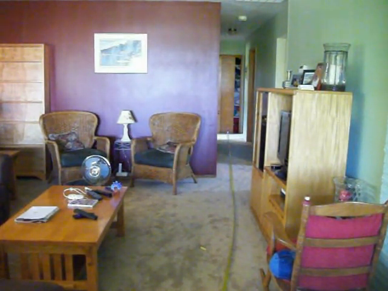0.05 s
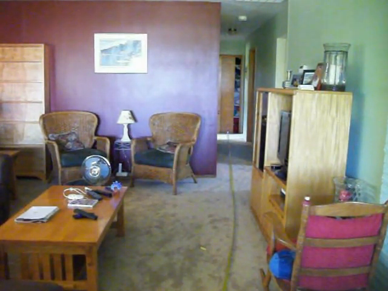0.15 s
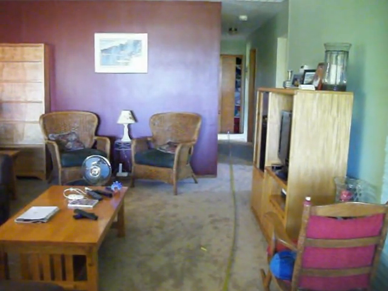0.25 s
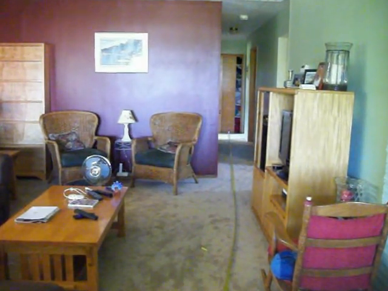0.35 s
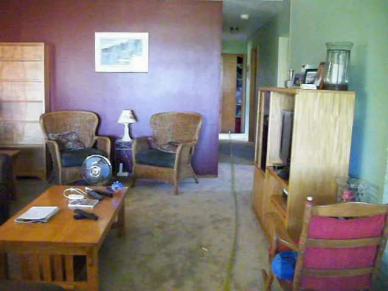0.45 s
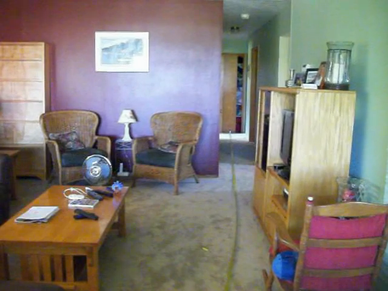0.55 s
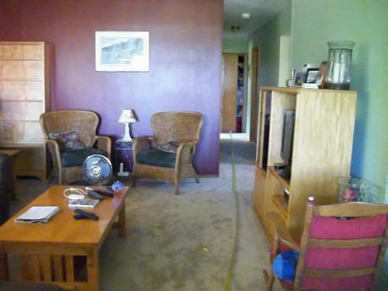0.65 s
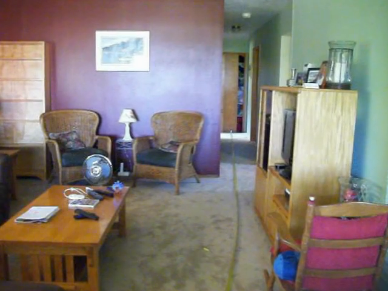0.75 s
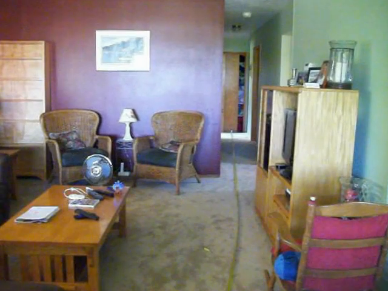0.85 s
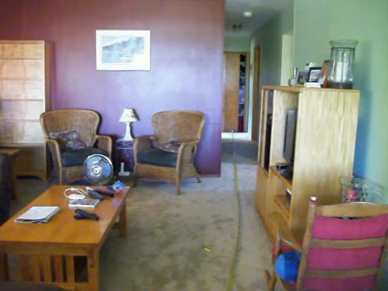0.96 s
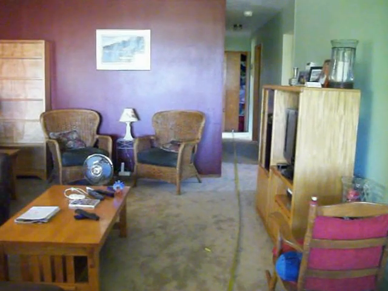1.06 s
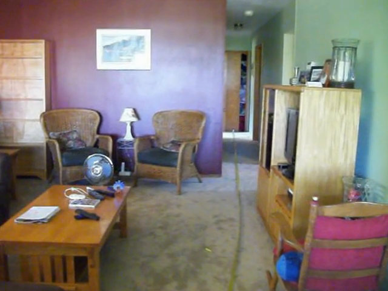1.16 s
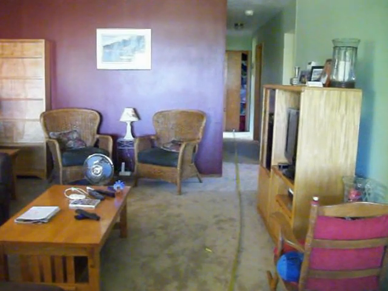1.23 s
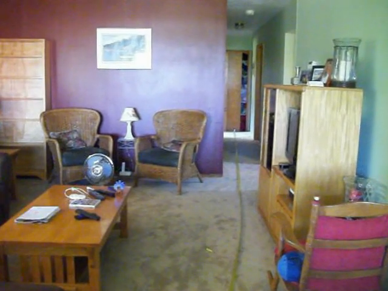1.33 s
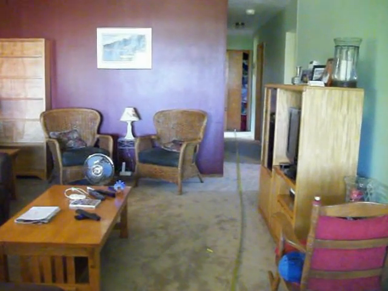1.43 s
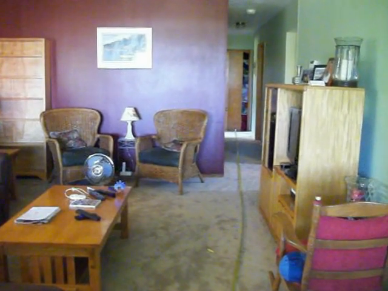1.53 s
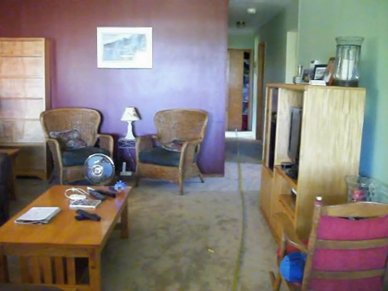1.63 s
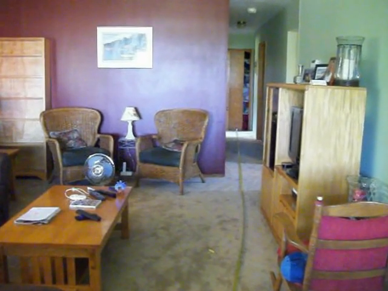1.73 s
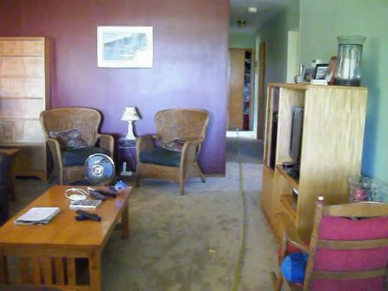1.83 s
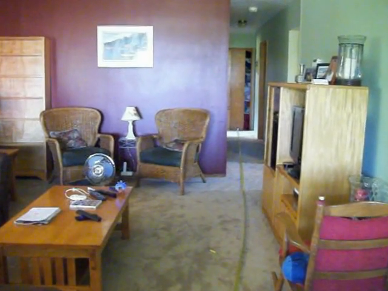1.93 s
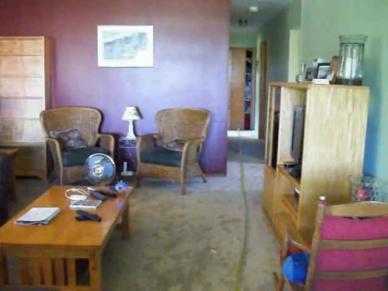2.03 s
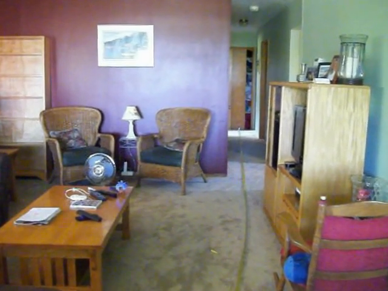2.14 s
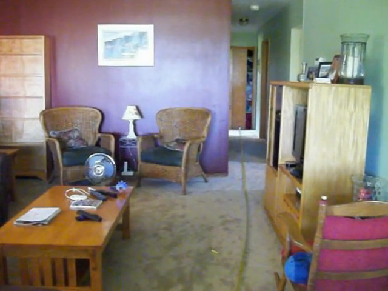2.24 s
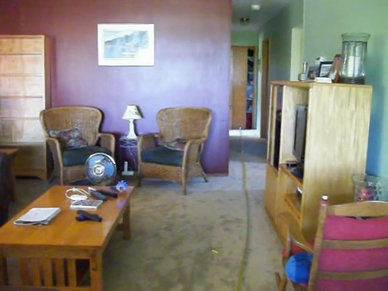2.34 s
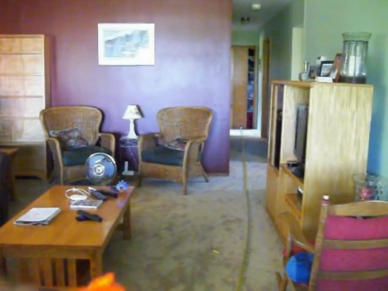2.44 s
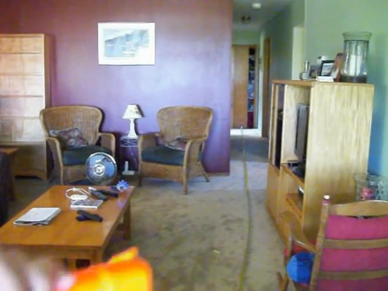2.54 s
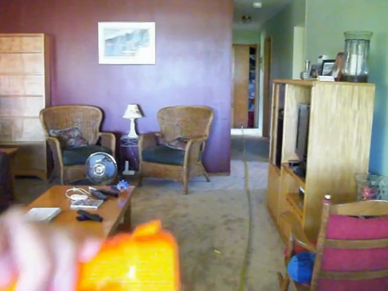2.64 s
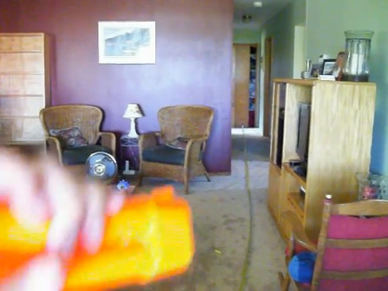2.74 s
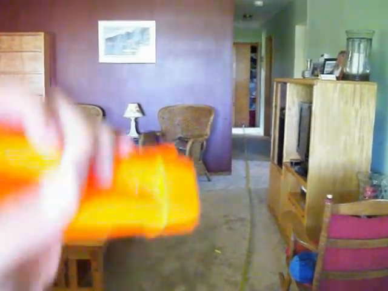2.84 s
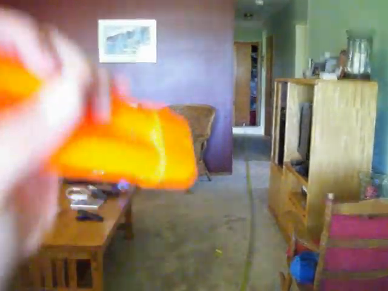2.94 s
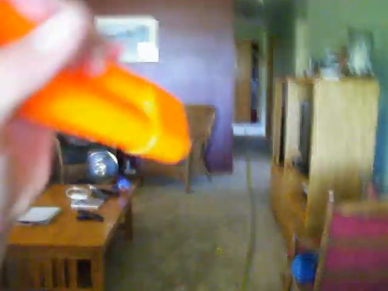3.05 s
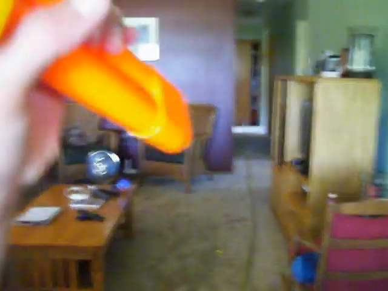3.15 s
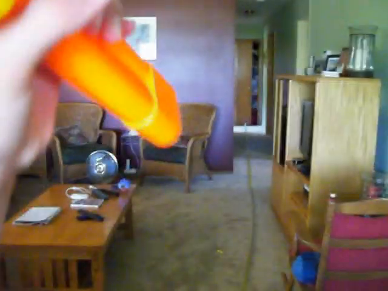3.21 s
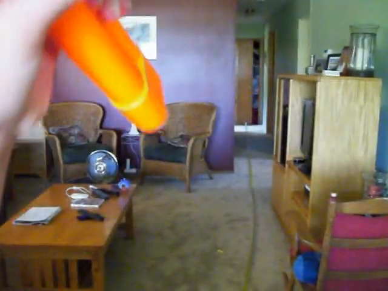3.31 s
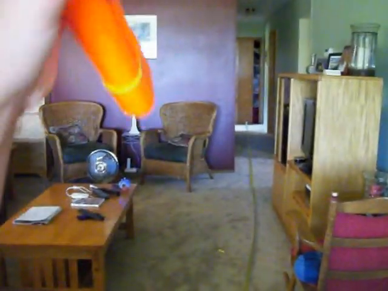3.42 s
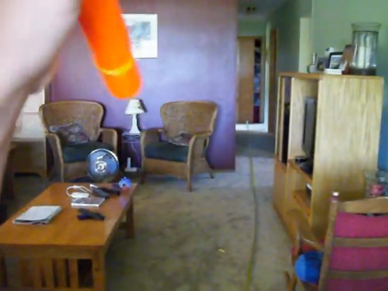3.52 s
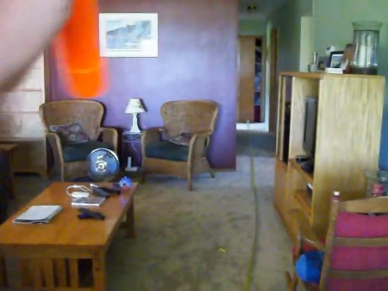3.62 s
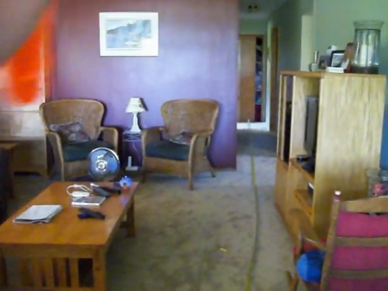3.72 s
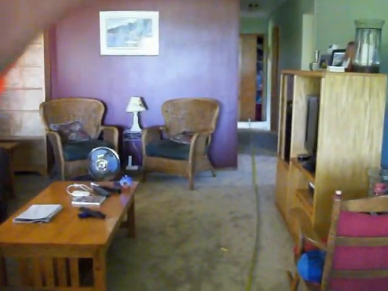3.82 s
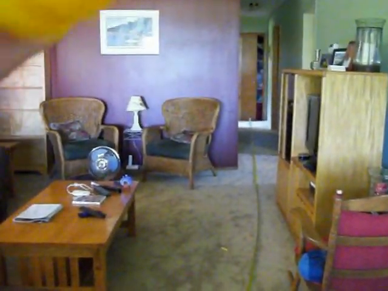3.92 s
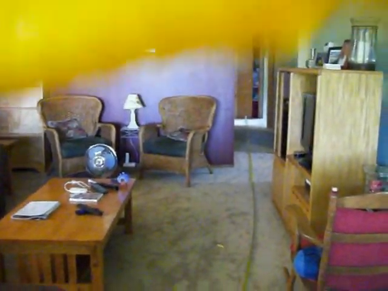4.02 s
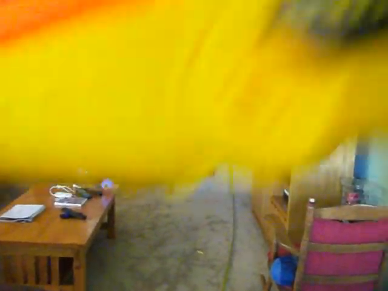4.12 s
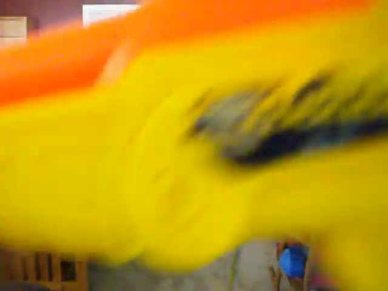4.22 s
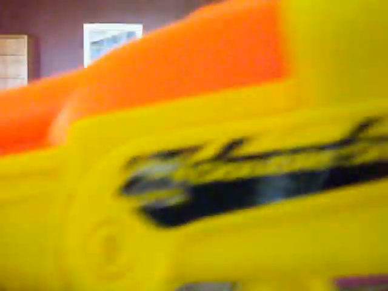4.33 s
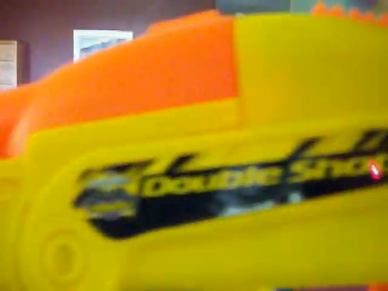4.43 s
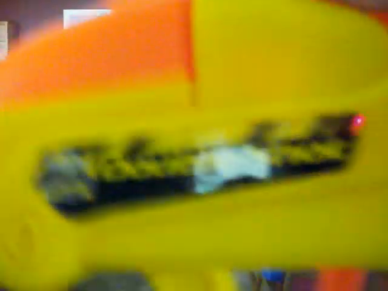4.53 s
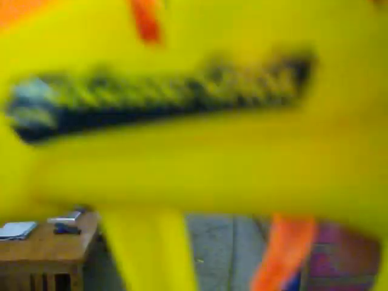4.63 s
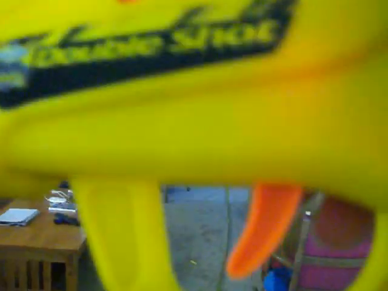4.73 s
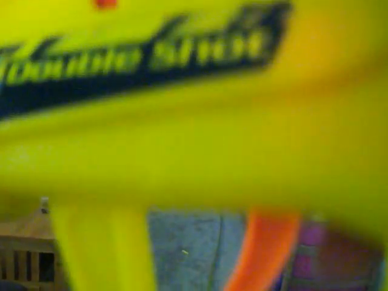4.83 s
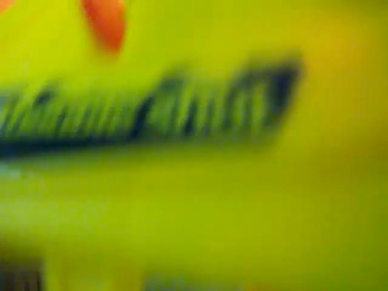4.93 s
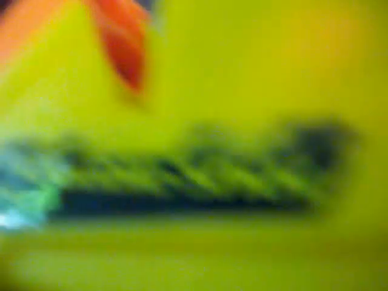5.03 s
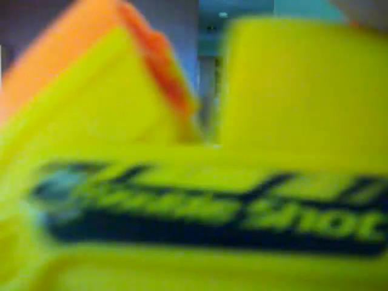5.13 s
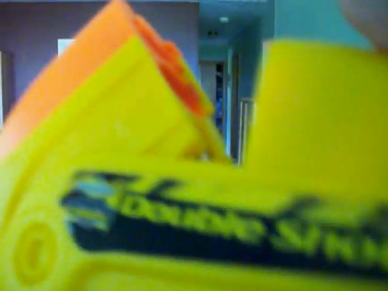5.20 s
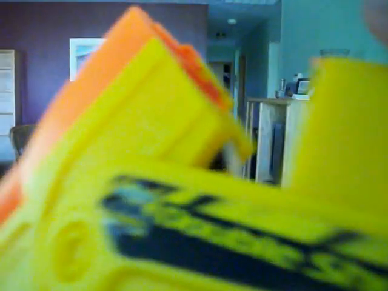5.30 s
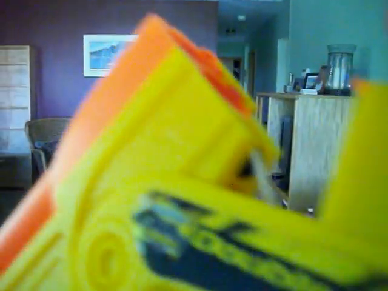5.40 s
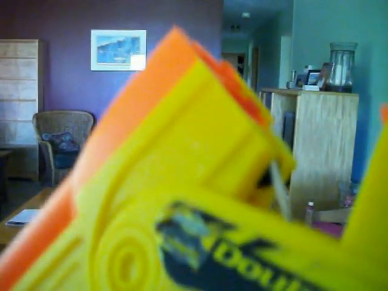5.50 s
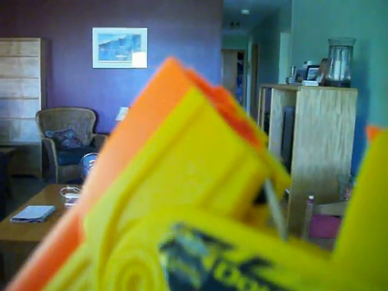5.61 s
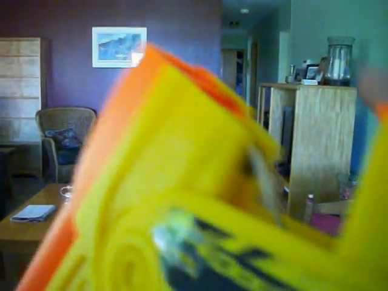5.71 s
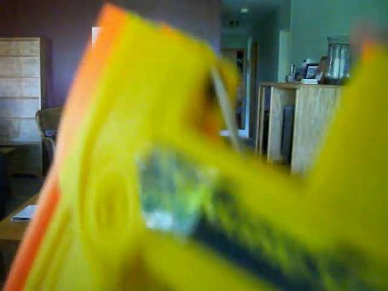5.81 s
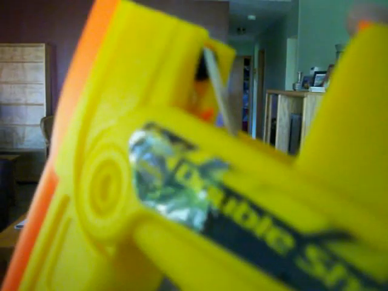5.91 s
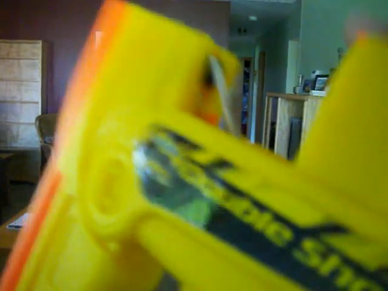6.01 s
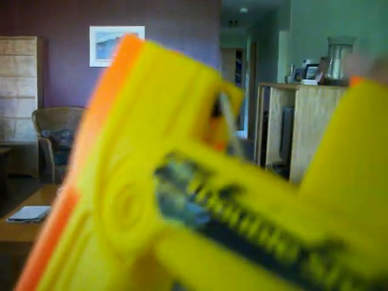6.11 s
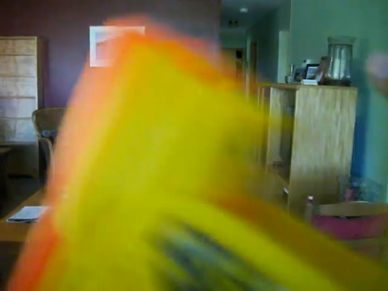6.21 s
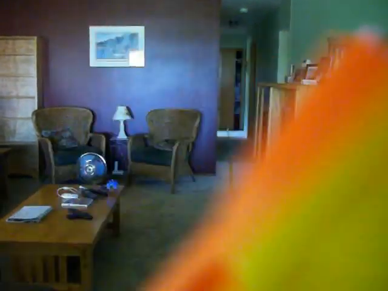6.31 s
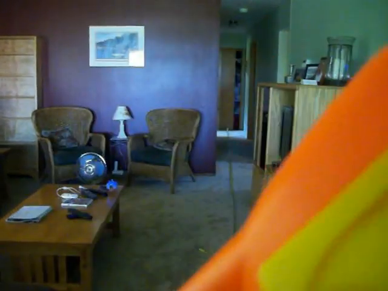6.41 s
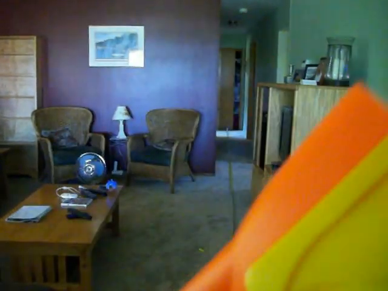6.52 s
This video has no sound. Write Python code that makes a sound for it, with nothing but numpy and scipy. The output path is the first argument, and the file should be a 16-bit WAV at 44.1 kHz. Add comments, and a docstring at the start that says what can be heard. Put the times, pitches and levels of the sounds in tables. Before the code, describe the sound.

In a quiet, softly humming living room, small plastic ticks and a faint hand brush lead to a brief toothed rasp. Around three seconds, a barrel bumps the microphone with dry knocks and low booms. After a pause, a hollow toy blaster is worked very close: sharp latch snaps, scraping slides and short hinge squeaks crowd together, growing louder and overloading a narrow, dull microphone, until the end.

```python
"""A plastic spring blaster is handled in a quiet living room: a few ticks, a hand's brush, a short rasp of a catch.
About 3 s in, its barrel bumps the microphone, which booms and knocks.
Then it is broken open close by: latches snap, and the barrel grinds and squeaks round its hinge.
Snaps, rasp and slides are pushes into one hollow shell's resonances; squeaks are harmonics, bands of hiss are noise.
A narrow-band recorder overloads on the hardest blows, over soft room noise, hum and whines."""
import sys
import numpy as np
from scipy import signal
from scipy.fft import rfft, irfft
from scipy.io import wavfile
from scipy.ndimage import uniform_filter1d

SR = 44100
rng = np.random.default_rng(int(sys.argv[2]) if len(sys.argv) > 2 else 0)


def materialize(psi):
    """Save the field psi as 16-bit PCM at rate SR to the path in sys.argv[1].

    A 1-D psi becomes a single channel; in a 2-D psi each row is a channel.
    """
    bounded = np.clip(np.atleast_2d(psi).T, -1, 1)
    quanta = np.round(bounded * 32767).astype(np.int16)
    wavfile.write(sys.argv[1], SR, quanta)


N = 289296


def from_db(db):
    """Amplitude ratio of a level in dB."""
    return 10 ** (np.asarray(db) / 20)


def rms_one(x):
    """Scale to rms 1."""
    return x / np.sqrt(np.mean(x ** 2) + 1e-20)


def at_hz(points, hz, axis=1):
    """Read a column of a table on a log-frequency axis."""
    points = np.array(points)
    return np.interp(np.log(np.maximum(hz, 1)), np.log(points[:, 0]), points[:, axis])


def add(out, start_s, sound):
    """Mix a sound in at a time."""
    i = max(int(start_s * SR), 0)
    out[i:i + len(sound)] += sound[:max(N - i, 0)]


def gate(t, length_s, edge_s):
    """A window with short linear ramps."""
    return np.clip(t / edge_s, 0, 1) * np.clip((length_s - t) / edge_s + .5, 0, 1)


def resonate(x, hz, width_hz):
    """One two-pole resonance."""
    r = np.exp(-np.pi * width_hz / SR)
    return signal.lfilter([1, 0, -1], [1, -2 * r * np.cos(2 * np.pi * hz / SR), r * r], x + 1e-18)


def favour(modes, centres_hz, lift_db, spread_oct):
    """The part that is struck brings out the resonances near its own pitches."""
    favoured = []
    for hz, width_hz, db in modes:
        lift = sum(lift_db * np.exp(-(np.log2(hz / centre) / spread_oct) ** 2) for centre in centres_hz)
        favoured.append((hz, width_hz, db + lift))
    return favoured


BASS_EDGE_HZ, TREBLE_EDGE_HZ = 600, 1800


def ranges(force, modes, vary_db, detune, shift_db=0):
    """Bass, middle, treble of a body's answer, rms 1 each; contacts favour other modes, sliding ones keep shifting."""
    out = np.zeros((3, len(force)))
    at = np.arange(len(force)) / 200  # a new random shift every 200 samples
    for k, (hz, width_hz, db) in enumerate(modes):
        knots = int(at[-1]) + 2
        shift = np.interp(at, np.arange(knots), rng.standard_normal(knots))
        mode_hz = hz * np.exp(detune * rng.normal())
        mode = rms_one(resonate(force * from_db(shift_db * shift), mode_hz, width_hz))
        part = int(hz > BASS_EDGE_HZ) + int(hz > TREBLE_EDGE_HZ)
        out[part] += (-1) ** k * from_db(db + vary_db * rng.normal()) * mode
    return [rms_one(part) for part in out]


def blows(rows, modes, chatter, bass_db, middle_db, treble_db, size=6000):
    """Each blow is a sharp push and a dying chatter of the loose parts, ringing the body."""
    out, t = np.zeros(N), np.arange(size) / SR
    for start_s, db, bass, treble, t60_s, *centres_hz in rows:
        force = chatter * rng.standard_normal(size) * from_db(-60 * t / max(t60_s, .003))
        force[0] += 1
        struck = favour(modes, centres_hz, lift_db=5, spread_oct=0.25)
        parts = ranges(force, struck, vary_db=2.0, detune=0.035)
        levels = from_db(db + np.array([bass + bass_db, middle_db, treble + treble_db]))
        add(out, start_s, sum(level * part / np.abs(part).max() for level, part in zip(levels, parts)))
    return out


# Resonances of the hollow shell. Each row: centre in Hz, width in Hz, level in dB within its range.
SHELL = [(221, 250, -2.5), (410, 102, 0.5), (679, 68, -7.5), (810, 104, -2.5), (941, 158, 1),
         (1179, 194, 0.5), (1478, 210, -2), (1748, 255, -2), (2072, 520, -0.5), (2600, 407, 1.5),
         (2853, 626, 1.5), (3836, 563, -0.5), (4460, 470, -1), (5240, 1130, -4.5)]
# Snaps of latches and ribs, levels before trims. Each row: start in seconds, peak of the middle range in dB,
# bass re middle in dB, treble re middle in dB, favoured middle pitch in Hz, favoured treble pitch in Hz.
SNAPS = [(0.159, -42.5, -8.5, -6, 953, 2570), (0.455, -34.5, -12, -10, 1046, 2240),
         (0.484, -34.5, -6, -9, 1000, 4280), (0.783, -42.5, -14, 1.5, 727, 4630),
         (1.214, -39, -12, -6.5, 1400, 2160), (1.387, -23.5, -19, -4.5, 939, 2920),
         (1.394, -22, -21, -0.5, 982, 2580), (1.932, -26, -15, -16, 680, 2400),
         (2.217, -23, -29, -2, 1600, 2150), (2.335, -27.5, -23, -2, 1330, 2920),
         (2.439, -27, -27, -9.5, 921, 1850), (2.664, -31.5, -12, 0.5, 990, 2953),
         (2.697, -36.5, -16, -2.5, 950, 4640), (2.86, -38, -14, 4, 1720, 2410),
         (3.773, -26, -18, -9, 1210, 3110), (4.01, -14.5, -25.5, 0, 1690, 1980),
         (4.02, -26, -32, -5.5, 1710, 2050), (4.292, -32, -9, -4, 945, 2050),
         (4.336, -23.5, -18, -2.5, 948, 2860), (4.513, -23.5, -17.5, -19.5, 730, 1900),
         (4.538, -26.5, -3, -9.5, 1480, 1890), (4.591, -7, -18, -2, 1644, 2230),
         (4.602, -13.5, -21, -8.5, 1010, 3570), (4.633, -20, -24.5, 6, 884, 2680),
         (4.653, -8.5, -16, -8, 876, 2990), (4.664, -21, -14, -3, 1030, 2820),
         (4.686, -9.5, -24.5, -13.5, 920, 2160), (4.697, -15.5, -33, -14, 985, 2000),
         (4.766, -11.5, -27, -18, 1070, 1930), (4.782, -17, -15, -0.5, 937, 4770),
         (4.8, -9, -22.5, -6.5, 1040, 2050), (4.858, -15, -20, -5.5, 1030, 2036),
         (4.884, -12, -20, -9, 880, 2000), (4.89, -10.5, -22, -6.5, 813, 2837),
         (4.946, -13, -19, 1, 1180, 4060), (4.978, -14.5, -12, -6, 1180, 2430),
         (5.019, -19.5, -23, -3.5, 1160, 2580), (5.052, -12, -15.5, -3, 848, 3050),
         (5.06, -12, -18.5, 2, 1250, 2500), (5.07, -12.5, -22.5, -10, 1250, 3520),
         (5.131, -16.5, -23.5, -3.5, 701, 3330), (5.147, -6, -20.5, -8.5, 1250, 4300),
         (5.194, -19.5, -22, -1.5, 1030, 1910), (5.228, -19.5, -28, -5.5, 1660, 1910),
         (5.249, -20.5, -18, -3, 985, 3510), (5.266, -22, -24, -7.5, 937, 4030),
         (5.281, -14, -28, -3.5, 1673, 3570), (5.31, -23, -18, 2.5, 794, 3890),
         (5.322, -11.5, -32.5, -10, 1540, 1820), (5.337, -18, -20, -0.5, 814, 3900),
         (5.377, -6.5, -25.5, -4, 950, 4760), (5.403, -9, -15, -4.5, 807, 1800),
         (5.418, -13.5, -19, -5, 972, 3790), (5.468, -4.5, -23, -5.5, 928, 1890),
         (5.493, -0.5, -22.5, -5, 908, 2215), (5.561, -8, -20.5, -6, 1140, 4160),
         (5.594, -8.5, -26, -3, 950, 1953), (5.685, -6.5, -23, -2, 943, 3786),
         (5.711, -9.5, -9.5, -15.5, 984, 2080), (5.753, -6, -18, -6, 894, 1793),
         (5.813, -17.5, -20, 3.5, 1060, 2190), (5.83, -8.5, -16, 3.5, 910, 4520),
         (5.875, -9.5, -12, -1, 945, 2910), (5.885, -6.5, -16.5, -5.5, 914, 4060),
         (5.907, -4.5, -24, -10, 950, 1860), (5.958, -6, -21.5, -7.5, 1440, 1810),
         (5.965, -7, -19.5, -8, 950, 3500), (6.027, -6, -27.5, -3, 904, 1950),
         (6.035, -6.5, -32, -10.5, 930, 1870), (6.045, -11.5, -21.5, -9.5, 870, 1850),
         (6.073, -10, -23, 1.5, 1110, 3850), (6.097, -9.5, -32, 0, 1130, 3590),
         (6.123, -5.5, -32, -7, 1040, 1920), (6.153, -16, -26, 3, 1150, 3720),
         (6.189, -6.5, -31.5, -2.5, 869, 3840), (6.26, -10.5, -23, -4, 950, 3030),
         (6.303, -6.5, -29.5, -4.5, 1030, 4610), (6.35, -6, -22.5, -4, 1260, 4760),
         (6.405, -2.5, -27.5, -7, 999, 1835), (6.489, -17, -32, 3, 1040, 3480)]
SHELL_CHATTER = .1  # rms of the chatter at its start, re the push
SNAP_T60_S, SOFT_DOUBLING_DB = 0.032, 18.5  # chatter decay; doubles per so many dB less treble


def snaps():
    """Latches and ribs strike the shell; the chatter of soft, dull contacts lasts longer."""
    rows = []
    for start_s, db, bass, treble, *pitches_hz in SNAPS:
        t60_s = SNAP_T60_S * 2 ** (-treble / SOFT_DOUBLING_DB)
        rows.append((start_s, db, bass, treble, t60_s, *pitches_hz))
    return blows(rows, SHELL, chatter=SHELL_CHATTER, bass_db=2.0, middle_db=-0.74, treble_db=7.5)


# Strokes of plastic on plastic. Each row: start in seconds, end in seconds, level in dB before trim,
# treble re middle in dB.
SLIDES = [(1.459, 1.501, -36, 7), (2.99, 3.05, -38.5, 5), (3.099, 3.137, -32, 10.5),
          (3.185, 3.236, -32.5, -3.5), (3.77, 3.792, -45, 1), (3.999, 4.019, -23, 2),
          (4.346, 4.453, -38.5, -10), (4.386, 4.407, -28, -20), (4.592, 4.62, -24, -7),
          (4.646, 4.661, -16.5, -1.5), (4.662, 4.715, -39, -16), (4.772, 4.843, -34.5, -13.5),
          (4.88, 4.892, -19, -0.5), (4.913, 4.994, -28, -4.5), (5.049, 5.07, -20.5, 1.5),
          (5.149, 5.379, -29, -8.5), (5.371, 5.434, -21.5, -6), (5.445, 5.564, -22, 1),
          (5.475, 5.496, -16.5, 1.5), (5.555, 5.595, -14.5, 2), (5.672, 5.76, -18, -6),
          (5.809, 5.881, -27, 1.5), (5.828, 5.827, -16, 5), (5.876, 5.929, -17.5, -3),
          (6.027, 6.138, -17, -2), (6.155, 6.198, -22.5, 1), (6.19, 6.223, -15, -1), (6.25, 6.277, -16, -2),
          (6.306, 6.425, -17, -4), (6.336, 6.36, -20.5, 4.5), (6.483, 6.549, -15, -3.5)]
STROKE_ATTACK_S, STROKE_RELEASE_DB_PER_S = 0.0027, 899.5
PRESSURE_DB, PRESSURE_PER_S = 0.5, 120  # the hand's pressure wavers: spread, changes per second
GRIT = .22  # rms re the slips


def slides(slips_per_s, uneven_db, bass_db, level_db, count=400):
    """Sliding faces catch and let go at uneven intervals, slips limited by friction; fine grit fills the gaps."""
    out = np.zeros(N)
    for start_s, end_s, db, treble in SLIDES:
        length_s = max(end_s - start_s, .01)
        t = np.arange(int((length_s + .05) * SR)) / SR
        slips_s = np.cumsum(rng.gamma(2, .5, count)) / slips_per_s
        sizes = from_db(uneven_db * np.minimum(rng.normal(size=count), .5))
        sizes = sizes * rng.choice([-1, 1], size=count)
        inside = slips_s < t[-1]
        force = np.zeros(len(t))
        force[(slips_s[inside] * SR).astype(int)] = sizes[inside]
        force = rms_one(force) + GRIT * rng.standard_normal(len(t))
        bass, middle, high = ranges(force, SHELL, vary_db=3.0, detune=0.027, shift_db=2.5)
        pressure = PRESSURE_DB * np.interp(t * PRESSURE_PER_S, np.arange(count), rng.standard_normal(count))
        release = STROKE_RELEASE_DB_PER_S * np.maximum(t - length_s, 0)
        level = np.minimum(t / STROKE_ATTACK_S, 1) * from_db(level_db + db + pressure - release)
        add(out, start_s, level * (from_db(bass_db) * bass + middle + from_db(treble) * high))
    return out


# The hinge sticks and slips fast enough to squeak. Each row: start in seconds, end in seconds,
# first slips per second, last slips per second, rms before the gate in dB.
SQUEAKS = [(5.691, 5.71, 1010, 1030, -13.5), (5.766, 5.808, 898, 1160, -12.5),
           (6.216, 6.233, 871, 1250, -12.5), (6.269, 6.277, 990, 1030, -13.5),
           (6.537, 6.555, 1040, 970, -14.5)]
SQUEAK_JITTER = .013  # rms share of the pitch
SQUEAK_GLIDE_POWER = 2.8  # the pitch holds, then runs away at the end
FIRST_FALL_DB_PER_OCT, LAST_FALL_DB_PER_OCT = -7, -21


def squeaks(count=5):
    """Regular stick-slip gives an unsteady stack of harmonics that grows purer as its pitch runs away."""
    out = np.zeros(N)
    for start_s, end_s, first_hz, last_hz, db in SQUEAKS:
        length_s = max(end_s - start_s, .005)
        t = np.arange(0, length_s + 0.0048, 1 / SR)
        glide = np.minimum(t / length_s, 1) ** SQUEAK_GLIDE_POWER
        wobble = rms_one(uniform_filter1d(rng.standard_normal(len(t)), size=80))
        pitch_hz = (first_hz + (last_hz - first_hz) * glide) * (1 + SQUEAK_JITTER * wobble)
        phase = 2 * np.pi * np.cumsum(pitch_hz) / SR
        fall = FIRST_FALL_DB_PER_OCT + (LAST_FALL_DB_PER_OCT - FIRST_FALL_DB_PER_OCT) * glide
        tone = sum(from_db(fall * np.log2(k)) * np.sin(k * phase + k * k) for k in range(1, count + 1))
        add(out, start_s, rms_one(tone) * from_db(db) * gate(t, length_s, edge_s=0.002))
    return out


RASP_START_S, RASP_END_S = 1.425, 1.496
TEETH_PER_S, RASP_RISE_DB_PER_S, TOOTH_T60_S = 215, 140, 0.043
LAST_TOOTH_DB, RASP_BASS_DB, RASP_TREBLE_DB = -24.5, -31, 2.5  # middle peak; bass, treble re middle


def rasp():
    """A catch is drawn over evenly spaced teeth, pressed ever harder."""
    teeth_s = np.arange(RASP_END_S, RASP_START_S, -1 / TEETH_PER_S)
    rows = [(s, LAST_TOOTH_DB - RASP_RISE_DB_PER_S * (RASP_END_S - s), 0, 0, TOOTH_T60_S) for s in teeth_s]
    return blows(rows, SHELL, SHELL_CHATTER, bass_db=RASP_BASS_DB, middle_db=0, treble_db=RASP_TREBLE_DB)


# Bands of hiss: a hand brushing over the shell, and the room's fading tail after the rasp (from 1.499 s).
# Each row: start in seconds, end in seconds, start level in dB, end level in dB, centre in Hz, width in Hz.
HISSES = [(0.313, 0.44, -61.5, -44.5, 3980, 3200), (0.48, 0.515, -40, -50, 4370, 1200),
          (1.499, 1.874, -46, -60.5, 2200, 4700), (2.434, 2.675, -61.5, -57.5, 2700, 2460),
          (2.814, 2.867, -55, -46.5, 3170, 2970), (4.387, 4.46, -25.5, -45, 2580, 1660)]


def hisses():
    """Brushing, and the room's tail after the rasp, are smooth bands of noise with a sliding level."""
    out = np.zeros(N)
    for start_s, end_s, start_db, end_db, hz, width_hz in HISSES:
        length_s = max(end_s - start_s, .01)
        t = np.arange(int((length_s + 0.014) * SR)) / SR
        noise = rng.standard_normal(len(t))
        hiss = rms_one(resonate(resonate(noise, hz, width_hz), hz, width_hz))
        level = from_db(np.interp(t, [0, length_s], [start_db, end_db]))
        add(out, start_s, hiss * gate(t, length_s, edge_s=0.0064) * level)
    return out


# Resonances of the microphone's case. Each row: centre in Hz, width in Hz, level in dB within its range.
CASE = [(134, 59, -1.5), (304, 78, -5.5), (527, 196, -5.5), (1274, 190, 1), (1608, 260, -2.5),
        (1944, 160, -1), (2320, 200, -2), (2800, 725, 0), (3780, 1600, -11), (4130, 240, -22)]
# Blows of the barrel on the case, levels before trims. Each row: start in seconds, peak of the middle range in dB,
# bass re middle in dB, treble re middle in dB, chatter t60 in seconds.
KNOCKS = [(2.992, -16.5, -2, 1, 0.066), (3.001, -11.5, -12, -8, 0.012), (3.010, -3, -12.5, -16, 0.012),
          (3.0135, -5.5, -15, 4, 0.0077), (3.0235, -5, -7, -4.5, 0.018), (3.039, -13, -4, 0, .023),
          (3.046, 0, -19, -10.5, 0.0083), (3.0495, -7, -14, 5, 0.011), (3.062, -25.5, 0.5, 9.5, 0.0146),
          (3.096, 4.5, -13, -8.5, 0.0077), (3.113, -30, -9, 6.5, 0.013), (3.131, -16, -7.5, -7.5, 0.0076),
          (3.1872, -4.5, -18.5, -1, 0.025), (3.322, -14.5, -13, -6, 0.034)]


def knocks():
    """The barrel strikes the microphone's case and rings its resonances."""
    return blows(KNOCKS, CASE, chatter=0.1167, bass_db=3.5, middle_db=-1.0, treble_db=3.0)


# Low resonances of the case. Each row: centre in Hz, width in Hz, relative level in dB.
RUMBLE = [(75, 130, -23.5), (131.36, 8.7, 6.5), (223, 58, -2), (286, 24, -2), (480, 200, -58.5)]
# Rubbing carried through the case. Each row: start in seconds, end in seconds, nominal start level in dB,
# nominal end level in dB.
RUBS = [(2.987, 3.055, -15.5, -41), (3.06, 3.155, -33, -27), (3.168, 3.233, -28, -19.5),
        (3.24, 3.361, -29, -44), (4.528, 4.629, -34.5, -40.5), (4.9, 5.068, -41, -47.5)]


def rubs():
    """The case booms at its low resonances while something drags on it."""
    out = np.zeros(N)
    for start_s, end_s, start_db, end_db in RUBS:
        length_s = max(end_s - start_s, .01)
        t = np.arange(int((length_s + 0.043) * SR)) / SR
        force = rng.standard_normal(len(t)) * gate(t, length_s, edge_s=0.0027)
        boom = sum(from_db(db) * rms_one(resonate(force, hz, width_hz)) for hz, width_hz, db in RUMBLE)
        boom = rms_one(boom) * np.sqrt(length_s / t[-1])
        add(out, start_s, boom * from_db(np.interp(t, [0, length_s], [start_db, end_db])))
    return out


# Jolts of the arm that shake the microphone. Each row: start in seconds, peak in dB, pitch in Hz.
JOLTS = [(2.993, -16.5, 55), (3.083, -14, 123), (3.189, -22, 50), (4.981, -25, 90), (5.022, -26.5, 110),
         (5.495, -23.5, 60), (5.757, -29, 88), (5.832, -22.5, 71), (6.027, -21.5, 102), (6.302, -28, 76.5),
         (6.378, -17.5, 85)]


def jolts(decay_s, size=5000):
    """A jolt swings the microphone as a heavily damped sine, for about one cycle."""
    out, t = np.zeros(N), np.arange(size) / SR
    for start_s, db, hz in JOLTS:
        swing = np.sin(2 * np.pi * hz * t) * np.exp(-t / decay_s)
        add(out, start_s, from_db(db) * swing / swing.max())
    return out


# Room tail. Each row: frequency in Hz, t60 in seconds, level in dB before the band filter.
ROOM = [(250, 0.23, -8.5), (1000, 0.48, -10), (2540, 0.33, -12.5), (5000, 0.46, -16.5)]


def living_room(x, first_echo_s, size=26000):
    """A diffuse tail that starts with the nearest furniture and dies band by band."""
    t, response = np.arange(size) / SR, 0
    edges_hz = np.geomspace(120, 7680, 7)
    for low, high in zip(edges_hz, edges_hz[1:]):
        hz = np.sqrt(low * high)
        decay = np.exp(-np.log(1000) * t / at_hz(ROOM, hz))
        tail = rng.standard_normal(size) * decay * (t > first_echo_s)
        tail *= from_db(at_hz(ROOM, hz, axis=2)) / np.linalg.norm(tail)
        band = signal.butter(2, [low, high], "band", fs=SR, output="sos")
        response = response + signal.sosfilt(band, tail)
    return signal.fftconvolve(x, response)[:N]


# Spectrum shape of the room noise. Each row: frequency in Hz, relative density in dB per Hz.
FLOOR = [(20, -18.5), (55, -1), (90, -19.5), (195, -13.5), (360, -14), (480, -19), (720, -21.5),
         (950, -22.5), (2000, -29), (4000, -33.5), (4600, -33.5), (6000, -43.5), (6600, -54.5),
         (8500, -82.5)]
# Faint narrow bands. Each row: centre in Hz, rms in dB, width in Hz of each of two resonances.
WHINES = [(453.6, -60, 11), (5330, -72, 55), (5660, -75.5, 46)]
FLOOR_DB, MAINS_HZ, MAINS_DB = -48.5, 59.5, -55.5  # levels are rms


def background():
    """Soft room noise with mains hum and faint whines."""
    hiss = irfft(rfft(rng.standard_normal(N)) * from_db(at_hz(FLOOR, np.fft.rfftfreq(N, 1 / SR))), N)
    whines = np.zeros(N)
    for hz, db, width_hz in WHINES:
        noise = rng.standard_normal(N + SR)  # the first second settles the resonances
        whines += from_db(db) * rms_one(resonate(resonate(noise, hz, width_hz), hz, width_hz)[SR:])
    hum = from_db(MAINS_DB) * np.sqrt(2) * np.sin(2 * np.pi * MAINS_HZ * np.arange(N) / SR)
    return from_db(FLOOR_DB) * rms_one(hiss) + whines + hum


def scene():
    """The blaster sounds through the air; blows on the case reach the microphone almost dry."""
    hinge = slides(slips_per_s=340, uneven_db=4.0, bass_db=-21.5, level_db=-3.5) + squeaks()
    case_blows = knocks()
    blaster = snaps() + rasp() + hinge + hisses()
    room = living_room(blaster + from_db(-11.5) * case_blows, first_echo_s=.005)
    return (blaster + case_blows + rubs() + jolts(decay_s=0.00266) + room + background())[None]


RECORDER_TOP_HZ, RECORDER_STOP_HZ, CUTOFF_HZ = 5980, 7500, 15900


def record(dry):
    """A narrow-band recorder; the hardest peaks hit full scale and are flattened, then low-passed again."""
    dull = signal.sosfilt(signal.butter(8, RECORDER_TOP_HZ, fs=SR, output="sos"), dry)
    narrow = signal.sosfilt(signal.cheby2(16, 70, RECORDER_STOP_HZ, fs=SR, output="sos"), dull)
    flattened = np.clip(narrow, -1, 1)
    return signal.sosfilt(signal.cheby2(14, 70, CUTOFF_HZ, fs=SR, output="sos"), flattened)


dry = scene()
out = record(dry)
materialize(out)
```